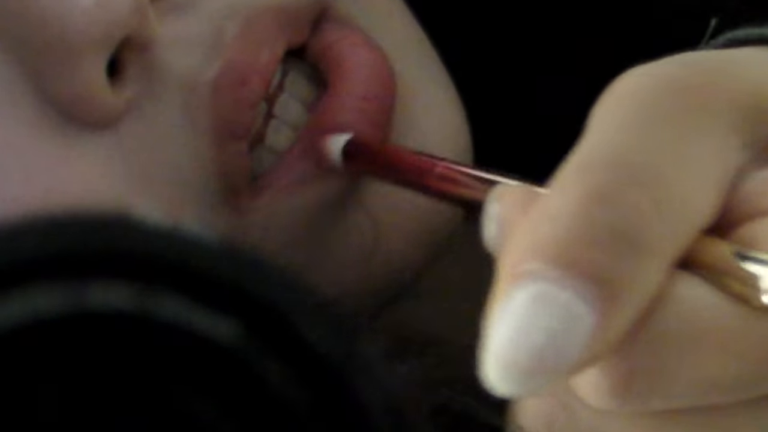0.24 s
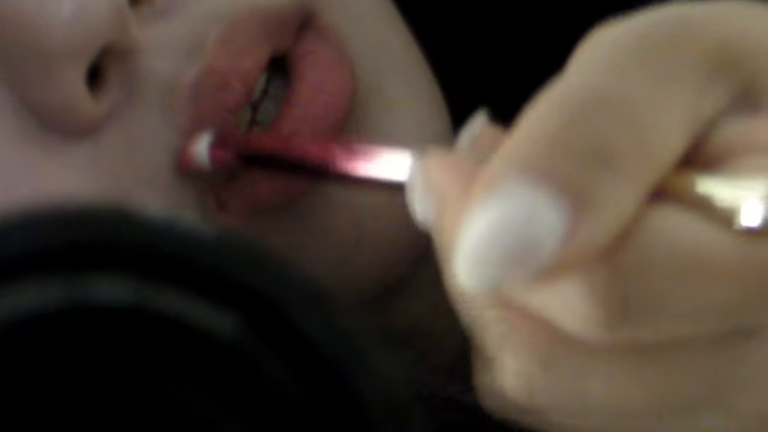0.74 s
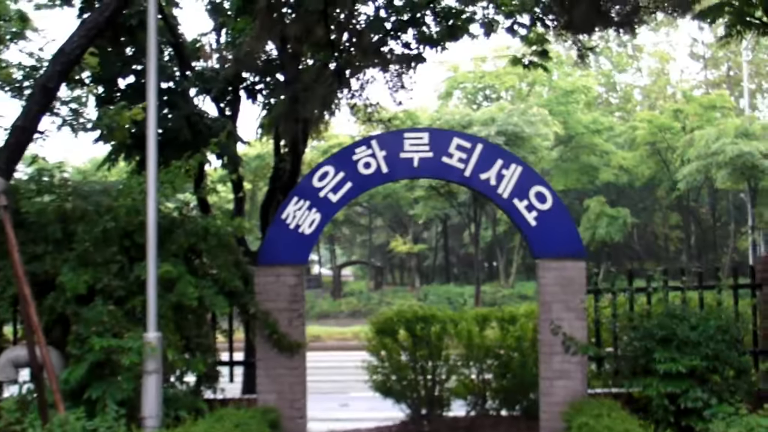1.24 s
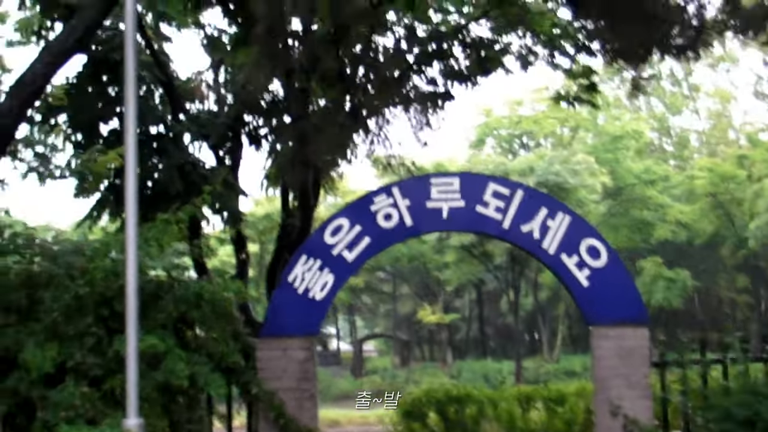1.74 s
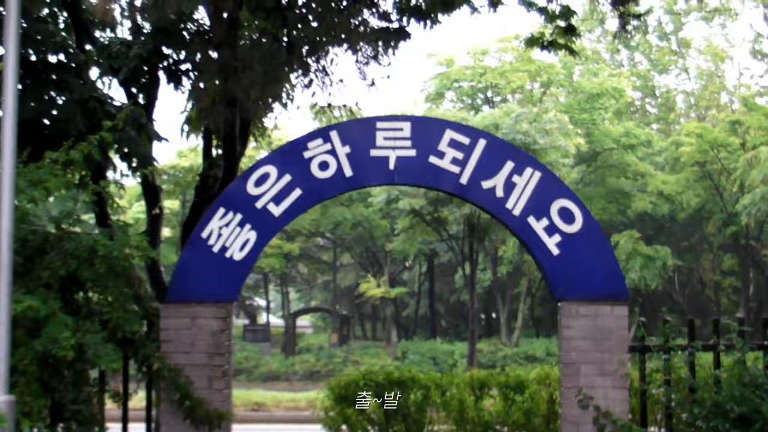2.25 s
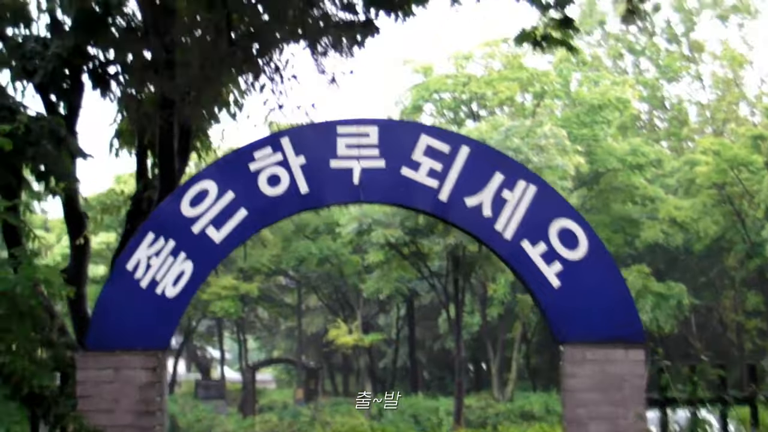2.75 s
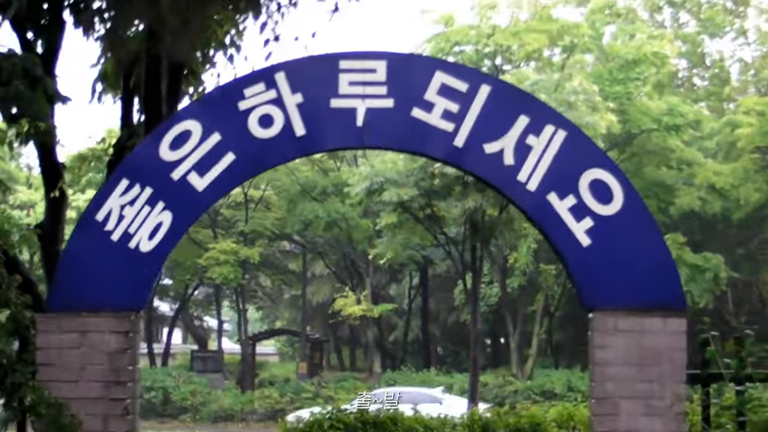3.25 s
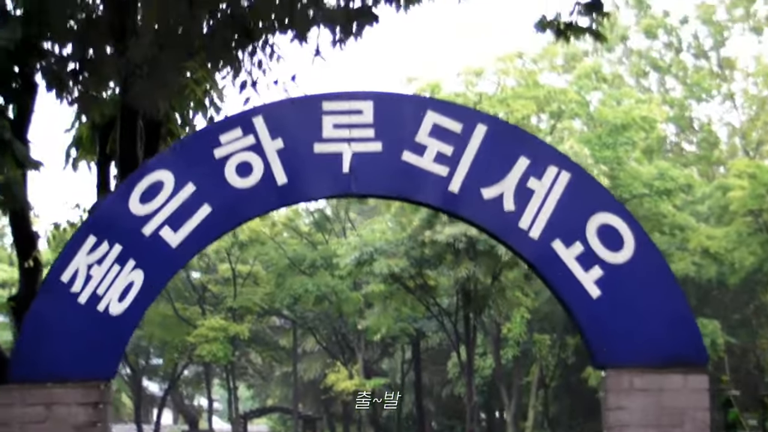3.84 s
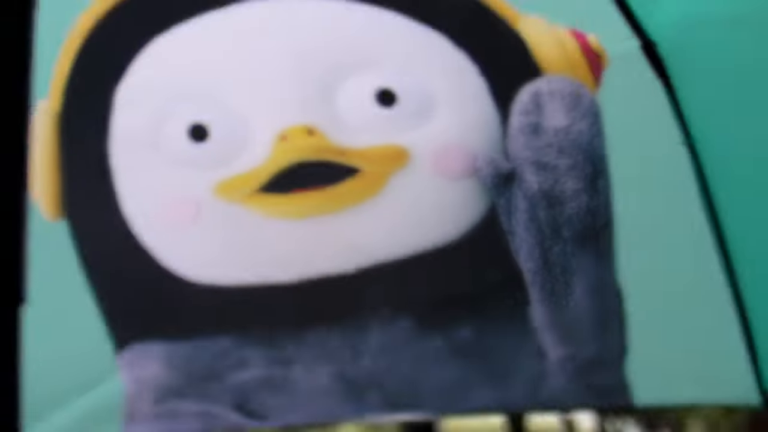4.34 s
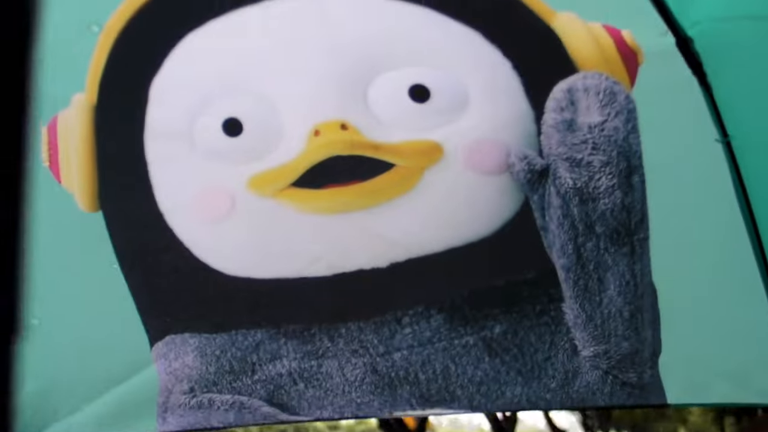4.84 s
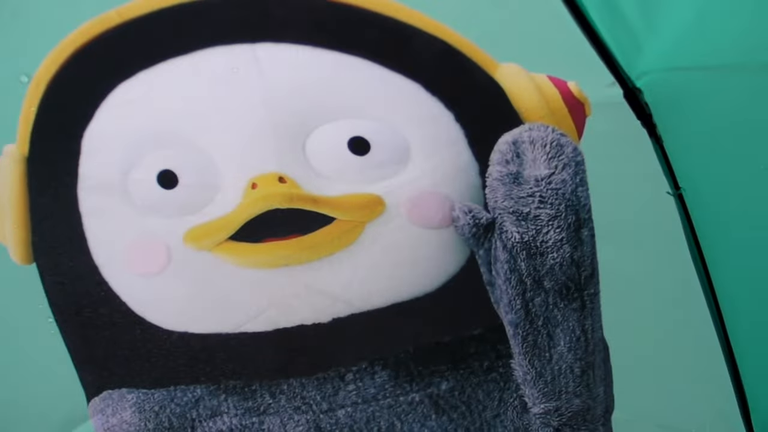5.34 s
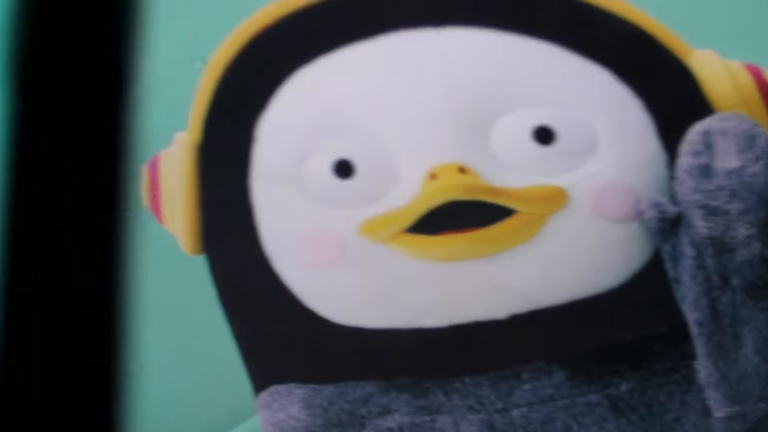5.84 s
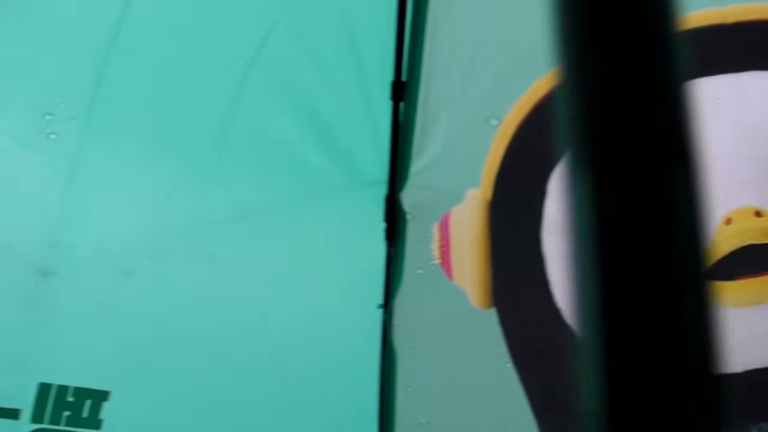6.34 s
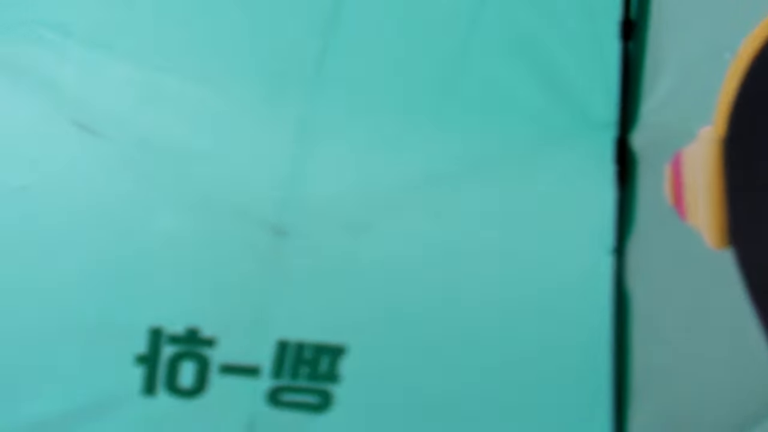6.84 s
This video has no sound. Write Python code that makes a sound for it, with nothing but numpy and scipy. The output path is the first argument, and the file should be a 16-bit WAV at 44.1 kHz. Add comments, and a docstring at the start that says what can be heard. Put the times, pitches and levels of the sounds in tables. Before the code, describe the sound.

Nearly a second of dim indoor hum and hiss gives way to steady rain and low traffic rumble outdoors. Soft air thumps hit the close microphones, two small drops tick brightly, and tyres swish by, left to right. Sound drops out for an instant, then returns with a brighter, wetter pass and a wavering engine tone.

```python
"""A quiet room with mains hum cuts to a rainy street: drops patter and cars pass on the wet road, tyres roaring.
After a short silent gap a second street view follows.
Rain and traffic are shaped noise, engines are steady or gliding sine waves, and wind is lumpy low noise.
Two close microphone ports hear each car first on the left, then on the right; the stereo is then widened."""
import sys
import numpy as np
from scipy import signal
from scipy.fft import rfft, irfft, next_fast_len
from scipy.io import wavfile
from scipy.ndimage import uniform_filter1d, map_coordinates

SR = 44100
rng = np.random.default_rng(int(sys.argv[2]) if len(sys.argv) > 2 else 0)


def waveform_to_disk(signal):
    """Save audio, clipped to [-1, 1], as 16-bit WAV at the path in sys.argv[1]."""
    frames = np.transpose(np.atleast_2d(signal))
    scaled = np.clip(frames, -1, 1) * 32767
    samples = np.round(scaled).astype(np.int16)
    wavfile.write(sys.argv[1], SR, samples)


N = 313242
T = np.arange(N) / SR

ROOM_END, GAP_START, GAP_END = 0.8915, 4.2145, 4.2648  # s
SURGE_DB = 2  # size of the random surges in far traffic


def amp(db):
    """Turn decibels into a plain multiplier."""
    return 10 ** (np.asarray(db) / 20)


def unit(x):
    """Scale a sound to an average (RMS) strength of 1."""
    return x / np.sqrt(np.mean(np.abs(x) ** 2) + 1e-20)


def along(points, hz):
    """Read a curve of (frequency [Hz], value) points, spaced on a log axis."""
    f, v = np.transpose(points)
    return np.interp(np.log(hz + 1), np.log(f + 1), v)


def curves(rows, t=T):
    """Read each column after the time column at times t."""
    s, *cols = np.transpose(rows)
    return [np.interp(t, s, c) for c in cols]


def wobble(rate):
    """A smooth random curve with `rate` random points a second."""
    knots = rng.standard_normal(int(N * rate / SR) + 4)
    return map_coordinates(knots, [T * rate])


def filtered(x, response):
    """Multiply each frequency of x by response(hz)."""
    m = next_fast_len(N + 8192)
    return irfft(rfft(x, m) * response(np.fft.rfftfreq(m, 1 / SR)), m)[..., :N]


def shaped(x, spectrum):
    """Give x the tone colour of a (frequency [Hz], level [dB]) curve."""
    return filtered(x, lambda hz: amp(along(spectrum, hz)))


def noise():
    """Three unrelated streams of steady hiss."""
    return rng.standard_normal((3, N))


def patter(per_second, spread_db):
    """Three streams of tiny drop impacts of random strength, with the drop size capped."""
    drops = rng.random((3, N)) < per_second / SR
    size = np.minimum(rng.exponential(size=(3, N)), 3)
    return drops * amp(spread_db * size) * noise()


def road_levels(t):
    """Levels of tyre roar, tread swish, spray and fine mist at times t [dB]."""
    # traffic in the two street views, one list each:
    # (time [s], tyre roar [dB], tread swish [dB], spray [dB], fine mist [dB])
    road = [
        [(.9, -30, -30.5, -29.5, -40), (1.9, -27.5, -26.5, -32, -46), (2.7, -24, -28, -33, -44),
         (3.05, -24.5, -26.5, -28, -44), (3.25, -23, -26, -23.5, -34), (3.55, -21.5, -21.5, -25, -38),
         (4.05, -22.5, -27.5, -29.5, -39), (4.2, -23.5, -31, -40, -46)],
        [(4.28, -28, -30.5, -33.5, -39), (4.55, -28.5, -32, -36, -45), (4.9, -28.5, -25, -28, -33.5),
         (5.25, -22.5, -23.5, -27, -36.5), (5.43, -21, -19.5, -22.5, -34), (5.52, -20, -20.5, -18.5, -25.5),
         (5.75, -21, -27, -16, -26.5), (6.08, -20, -27, -16, -27.5), (6.16, -19.5, -24, -17, -38),
         (6.23, -23.5, -24, -17.5, -36), (6.46, -23.5, -22.5, -17, -32), (6.65, -26, -24, -17, -24),
         (6.95, -25, -23.5, -18, -25.5), (7.1, -24, -25.5, -21, -31)],
    ]
    return curves(road[0] + road[1], t)


def passing(t):
    """Each view's car on a straight road: port lag [ms], nearness 0-1, boom [dB], growl over roar [dB]."""
    # the car in each view: (abreast at [s], time to drive its own distance [s], widest port lag [ms],
    # body boom when abreast [dB], exhaust growl over the roar [dB])
    passes = [(3.55, .25, 0.093, -27, -10.5), (6.73, 0.35, 0.099, -30, -3.5)]
    view = (t > GAP_START).astype(int)
    abreast, reach, widest_ms, boom_db, growl_db = np.transpose(passes)[:, view]
    along_road = (t - abreast) / reach  # 0 when abreast
    lag_ms = widest_ms * along_road / np.hypot(1, along_road)
    nearness = 1 / (1 + along_road ** 2)
    return lag_ms, nearness, boom_db, growl_db


def at_ports(sources, spectrum, patchy_db, moving):
    """Three streams become stereo: two make the sound from all sides, the third is the car at its bearing."""
    ports_ms = 0.11  # sound's travel time from port to port
    # more spray: more of the traffic comes straight from the car
    direct_from_db, direct_span_db, direct_least = -36.5, 22.5, 0.33
    spread = 0.31  # share of the direct sound lost as the long car and its spray fill the view
    # path round the housing: delay in port lags, strength, frequency under which it fades [Hz]
    round_lags, round_strength, round_fade_hz = 1.42, 1.0, 1700

    hz, t, z = signal.stft(sources, SR, nperseg=512)
    hz = hz[:, None]

    # random patches in time and pitch
    field = uniform_filter1d(rng.standard_normal(z.shape[1:]), size=6, axis=0)
    field = uniform_filter1d(field, size=14, axis=1)
    z = z * amp(patchy_db * unit(field))

    # sound from all sides is alike at both ports only in the bass
    turn = np.arccos(np.sinc(2 * hz * ports_ms / 1000)) / 2
    mid, side = z[0] * np.cos(turn), z[1] * np.sin(turn)
    around = np.array([mid + side, mid - side])

    lag_ms, nearness = passing(t)[:2]
    spray_db = road_levels(t)[2]
    share = np.clip((spray_db - direct_from_db) / direct_span_db, direct_least, 1)
    share = share * (1 - spread * nearness)
    # the treble comes less clearly from one side the further the car is from abreast
    share = moving * share * np.exp(-(0.7 * hz * lag_ms / 1000) ** 2)

    early = np.exp(1j * np.pi * hz * lag_ms / 1000)  # half the lag, as a turn of phase
    # the shadowed port also gets a later copy that has crept round the housing
    creep = round_strength * (1 - nearness) * np.exp(-2j * np.pi * hz * round_lags * np.abs(lag_ms) / 1000)
    creep = creep * hz ** 4 / (hz ** 4 + round_fade_hz ** 4)
    shade = (1 + creep) / np.sqrt(1 + np.abs(creep) ** 2)
    left = np.where(lag_ms > 0, shade, 1) / early
    right = np.where(lag_ms < 0, shade, 1) * early
    car = z[2] * [left, right]

    pair = np.sqrt(1 - share) * around + np.sqrt(share) * car
    stereo = signal.istft(pair, SR, nperseg=512)[1][:, :N]
    return unit(shaped(stereo, spectrum))


def room():
    """Hiss that differs from port to port, with sine waves at multiples of the mains pitch on top."""
    # room air and preamp hiss: (frequency [Hz], level per Hz [dB])
    hiss_colour = [(12, -45), (20, -10), (64, 1), (122, -2), (207, -1.5), (352, -1), (452, -3), (7520, -18),
                   (12100, -26.5), (14300, -25), (15500, -20)]
    # mains hum: (multiple of mains pitch, level before the 4.5 dB lift below [dB])
    hum_partials = [(1, -64), (2, -63.5), (3, -64), (4, -65), (5, -62), (6, -64), (7, -66), (8, -67),
                    (9, -75), (10, -74), (11, -78)]
    hiss_db, mains_hz = -46, 60
    hiss = amp(hiss_db) * unit(shaped(rng.standard_normal((2, N)), hiss_colour))
    hum = np.zeros(N)
    for multiple, db in hum_partials:
        start_turn = rng.random()
        hum += amp(db + 4.5) * np.sin(2 * np.pi * (multiple * mains_hz * T + start_turn))
    return hiss + hum


def rain():
    """Thousands of drop impacts a second, half blurred into a steady wash by distance."""
    # tone of the rain: (frequency [Hz], level per Hz [dB])
    rain_colour = [(59, -45), (100, -7), (243, -26), (321, 1.5), (422, -23), (925, -4.5), (1120, 2),
                   (1980, 0.5), (2500, 0.5), (7530, -8), (15800, -28)]
    # strength of the rain: (time [s], level before wavering [dB])
    rain_level = [(.89, -24), (4.2, -21), (4.27, -26), (7.1, -24)]
    drops = unit(patter(3000, spread_db=2)) * 0.5 + noise()
    level_db, = curves(rain_level)
    return amp(level_db + 0.42 * wobble(3.36)) * at_ports(drops, rain_colour, patchy_db=0.85, moving=0)


def buffeting():
    """Lumpy low turbulence in bell-shaped swells as the microphones are carried, unrelated at the ports."""
    # tone of the turbulence: (frequency [Hz], level per Hz [dB])
    wind_colour = [(12, -40), (20, -26), (49, -12), (108, -3), (282, -12.5), (350, -11), (460, -52),
                   (770, -120)]
    # swells of turbulence: (centre [s], level added at the centre [dB], half width [s])
    swells = [(1.07, -32, 0.082), (1.9, -33.5, 0.096), (2.48, -29.5, 0.054), (2.72, -37, .04),
              (2.9, -37, 0.064), (3.38, -39, 0.13), (3.85, -46, .1), (4.08, -43, .04)]
    calm_db = -46, -50  # between swells, first and second view
    level = amp(np.where(T < GAP_START, *calm_db))
    for centre, db, half_width in swells:
        level = level + amp(db) * np.exp(-((T - centre) / half_width) ** 2)
    lumps = amp(3 * np.array([wobble(15), wobble(15)]))
    return level * unit(lumps * shaped(rng.standard_normal((2, N)), wind_colour))


def puffs():
    """Each puff of air pushes one port's diaphragm through a single slow swing."""
    # puffs: (time [s], level before the bell shape [dB], pitch [Hz], first swing +1 or -1, port 0 left 1 right)
    puff_list = [(.961, -13, 121, 1, 0), (1.145, -19, 110, -1, 0), (1.891, -11, 110, -1, 0),
                 (1.944, -25, 90, 1, 0), (2.506, -22, 130, 1, 1), (2.704, -18, 120, 1, 1)]
    out, t = np.zeros((2, N + SR)), T[:SR // 8]
    for s, db, hz, swing, port in puff_list:
        push = np.sin(2 * np.pi * hz * t) * np.exp(-(t * hz - 0.5) ** 2 / 0.52)
        out[round(port), round(s * SR):][:len(t)] += np.sign(swing) * amp(db) * push
    return out[:, :N]


def near_drops():
    """Near drops on metal ring briefly in the treble: bands of noise that die away."""
    # drops: (time [s], level before onset and pan [dB], pitch [Hz], band width [Hz],
    # time to fall 60 dB [s], left over right [dB])
    drip_list = [(2.076, -26, 10700, 350, .06, 6), (2.6235, -25.5, 12300, 6500, .08, -6)]
    out, t = np.zeros((2, N + SR)), T[:SR // 8]
    onset = 1 - np.exp(-t / 0.00066)
    for s, db, hz, width_hz, t60, pan_db in drip_list:
        edges = [hz - width_hz / 2, hz + width_hz / 2]
        band = signal.butter(2, edges, "bandpass", fs=SR, output="sos")
        ring = unit(signal.sosfilt(band, rng.standard_normal((2, len(t))))) * amp(db - 60 * t / t60)
        out[:, round(s * SR):][:, :len(t)] += ring * onset * amp([[pan_db / 2], [-pan_db / 2]])
    return out[:, :N]


def engines():
    """Engine tones swell out of the noise, steady or gliding, and sink back; one hum may return after a dip."""
    # drones: (start [s], end [s], start pitch [Hz], end pitch [Hz], level before wavering [dB],
    # pitch jitter [share of pitch])
    drones = [(0.858, 1.394, 181, 179, -33, 0.0053), (1.44, 1.97, 182, 179.8, -35, .004),
              (2.65, 3.35, 52.6, 51.7, -35.5, .004), (3.5, 4.2, 50.5, 51.2, -37, .004),
              (5.968, 6.801, 212.8, 310, -30, .045), (6.72, 7.095, 236.4, 282.3, -32.5, .05)]
    fade_share = 0.16  # share of a drone's length spent swelling, and again dying
    out = np.zeros(N)
    for start, end, from_hz, to_hz, db, jitter in drones:
        u = np.clip((T - start) / (end - start), 0, 1)
        fade = np.clip(np.minimum(u, 1 - u) / fade_share, 0, 1)
        hz = (from_hz + (to_hz - from_hz) * u) * (1 + jitter * wobble(45))
        level = amp(db + (1.5 + 70 * jitter) * wobble(11))
        out += fade * level * np.sin(2 * np.pi * np.cumsum(hz) / SR)
    return out


def far_rumble():
    """Far traffic as deep noise with random surges."""
    # tone: (frequency [Hz], level per Hz [dB])
    rumble_colour = [(12, -48), (20, -34), (43, -3.5), (146, -1.5), (200, -1), (260, -39), (440, -120)]
    # far traffic: (time [s], level before surges [dB])
    rumble_level = [(.89, -38), (3.3, -36.5), (4.2, -38), (5.3, -35), (6.15, -35.5), (6.5, -48), (7.1, -45)]
    level_db = curves(rumble_level)[0] + SURGE_DB * wobble(8.2)
    return amp(level_db) * at_ports(noise(), rumble_colour, patchy_db=1.0, moving=0.5)


def body_boom():
    """Low boom of far traffic, joined by the passing car's body when it is near."""
    # tone: (frequency [Hz], level per Hz [dB])
    boom_colour = [(71, -31), (120, -12), (162, -11), (220, -4), (291, -4), (333, -11.5), (420, -9.5),
                   (550, -19.5), (920, -120)]
    far_boom_db, grows = -33, 0.41  # average level; rise in dB per dB of roar
    roar_db = road_levels(T)[0]
    _, nearness, abreast_db, _ = passing(T)
    far_db = far_boom_db + grows * (roar_db - roar_db.mean())
    level = np.hypot(amp(far_db + SURGE_DB * wobble(9)), amp(abreast_db) * nearness)
    return level * at_ports(noise(), boom_colour, patchy_db=1.14, moving=0.95)


def exhaust_growl():
    """Exhaust noise that follows the tyre roar and thins while the car is abreast."""
    # tone: (frequency [Hz], level per Hz [dB])
    growl_colour = [(210, -42), (350, -1.5), (366, -7.5), (476, -3.5), (800, -3), (1040, -29), (1760, -120)]
    thin_db = 2
    _, nearness, _, over_db = passing(T)
    level_db = road_levels(T)[0] + over_db - thin_db * nearness + 0.59 * wobble(9)
    return amp(level_db) * at_ports(noise(), growl_colour, patchy_db=0.9, moving=0.72)


def tyre_roar(flicker):
    """Tyres rolling on the road, as flickering mid-range noise."""
    # tone: (frequency [Hz], level per Hz [dB])
    roar_colour = [(410, -34), (700, -7.5), (942, 2), (1170, -4), (1350, -15), (1760, -37), (2970, -120)]
    level_db = road_levels(T)[0] + 0.6 * flicker + 0.53 * wobble(11)
    return amp(level_db) * at_ports(noise(), roar_colour, patchy_db=1.6, moving=0.87)


def tread_swish(flicker, gusts):
    """The tread's swish on the wet road, as noise pitched above the roar."""
    # tone: (frequency [Hz], level per Hz [dB])
    swish_colour = [(740, -12), (1250, -5.5), (1330, 1.5), (1680, 1), (2700, -12), (3510, -39),
                    (5940, -120)]
    level_db = road_levels(T)[1] + 1.1 * flicker + 0.29 * gusts
    return amp(level_db) * at_ports(noise(), swish_colour, patchy_db=1.2, moving=1)


def wet_noise():
    """Flung water: drop impacts mixed with steady hiss."""
    return unit(patter(5000, spread_db=1)) * 0.72 + noise()


def spray(flicker, gusts):
    """Water flung up by the tyres hisses in flickering gusts."""
    # tone: (frequency [Hz], level per Hz [dB])
    spray_colour = [(1290, -26), (2200, -2), (2520, -7), (3050, -2.5), (4350, -2), (4700, -2.5), (6660, -5),
                    (7460, -7), (12000, -24.5), (15600, -21), (22000, -120)]
    level_db = road_levels(T)[2] + 1.35 * flicker + 0.85 * gusts
    return amp(level_db) * at_ports(wet_noise(), spray_colour, patchy_db=1, moving=0.93)


def mist(flicker, gusts):
    """The finest flung water hisses highest and follows the gusts most."""
    # tone: (frequency [Hz], level per Hz [dB])
    mist_colour = [(4710, -24), (8000, -5), (8090, -5.5), (14000, -9), (16000, -17)]
    level_db = road_levels(T)[3] + 1.0 * flicker + 1.4 * gusts
    return amp(level_db) * at_ports(wet_noise(), mist_colour, patchy_db=1.5, moving=0.82)


def traffic():
    """Cars rumble, boom, growl and roar; tyre sounds and water share one flicker."""
    flicker = 0.39 * wobble(16) + 0.75 * wobble(40)
    gusts = wobble(7)
    cars = far_rumble() + body_boom() + exhaust_growl() + tyre_roar(flicker)
    water = tread_swish(flicker, gusts) + spray(flicker, gusts) + mist(flicker, gusts)
    return cars + water


def scene():
    """The room, then the street with a silent gap whose front edge dies within milliseconds."""
    street = rain() + buffeting() + puffs() + near_drops() + engines() + traffic()
    dying = amp(-60 * np.clip(T - GAP_START, 0, 1) / 0.017)  # falls 60 dB in 17 ms
    gap = np.where(T < GAP_END, dying, 1)
    return np.where(T < ROOM_END, room(), street * gap)


def record(dry):
    """Each side loses a share of the other, which widens the picture; peaks round off; the top is cut."""
    # widening: (frequency [Hz], share of the other side taken away)
    widening = [(100, 0.18), (1000, 0.28), (8000, 0.06), (15000, 0.012)]
    top_hz = 15800
    wide = dry - filtered(dry[::-1], lambda hz: along(widening, hz))
    rounded = wide / (1 + np.abs(wide / 0.95) ** 6) ** (1 / 6)
    return filtered(rounded, lambda hz: hz < top_hz)


dry = scene()
out = record(dry)
waveform_to_disk(out)
```